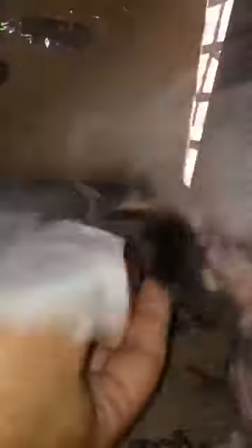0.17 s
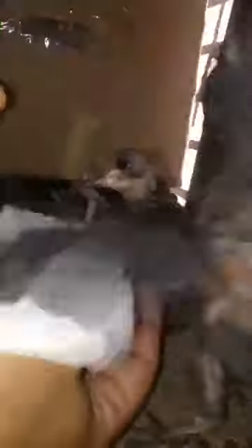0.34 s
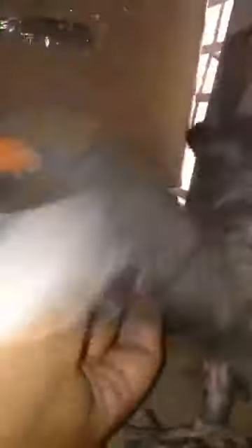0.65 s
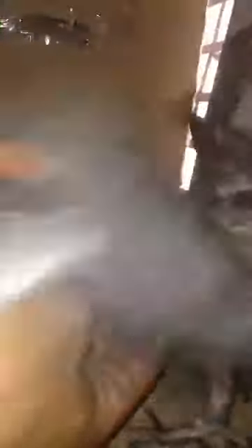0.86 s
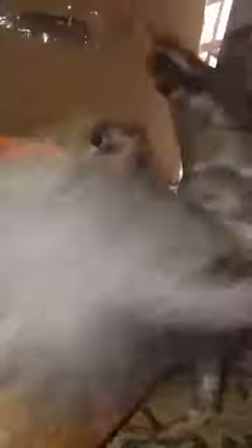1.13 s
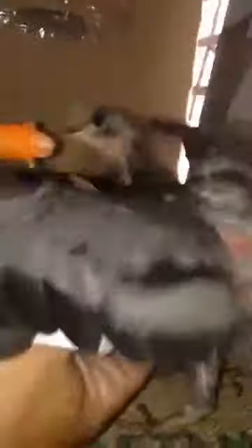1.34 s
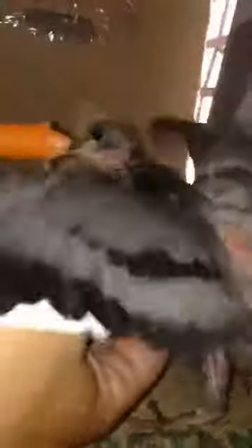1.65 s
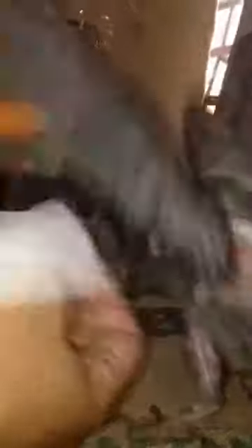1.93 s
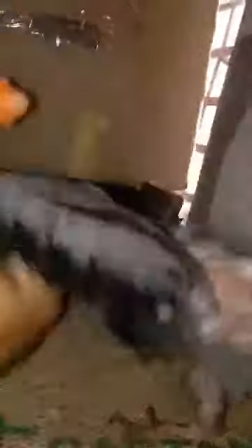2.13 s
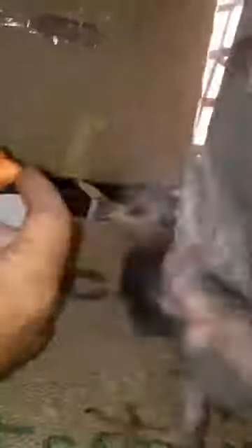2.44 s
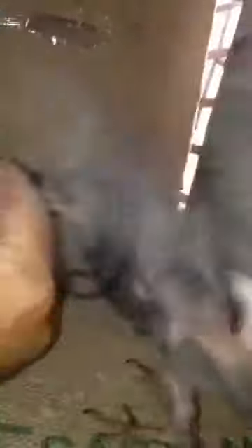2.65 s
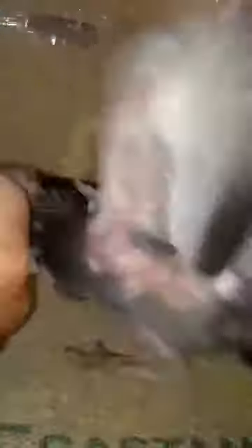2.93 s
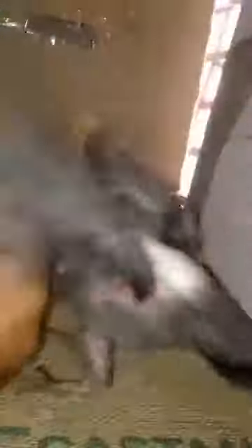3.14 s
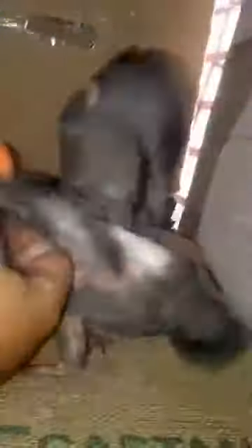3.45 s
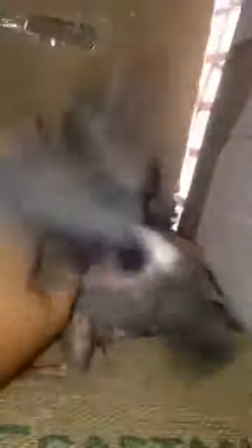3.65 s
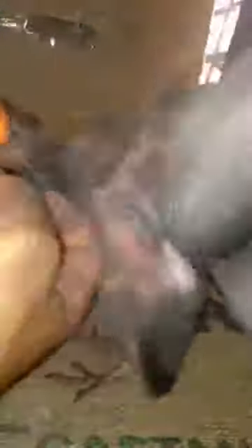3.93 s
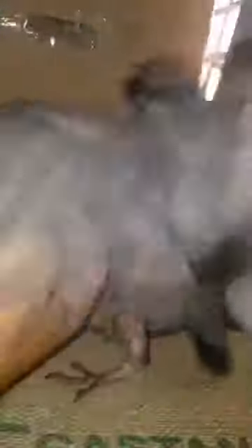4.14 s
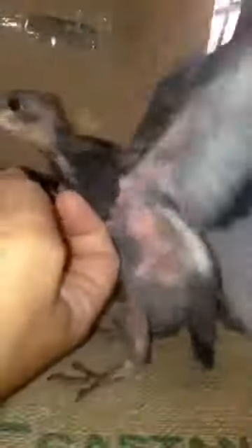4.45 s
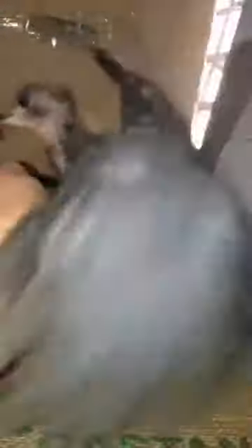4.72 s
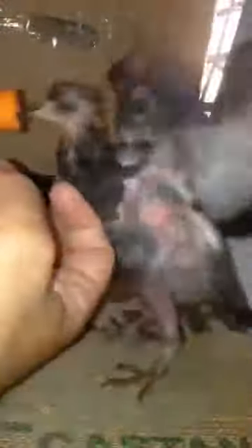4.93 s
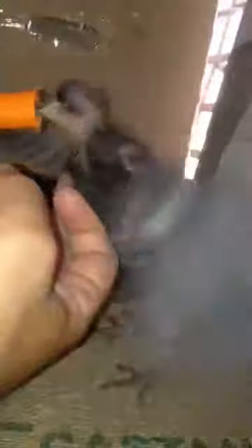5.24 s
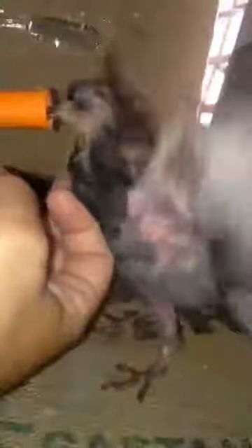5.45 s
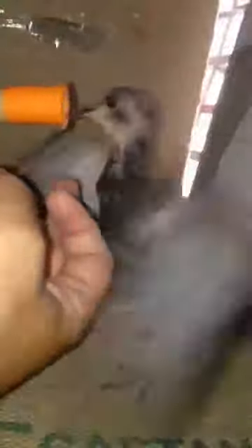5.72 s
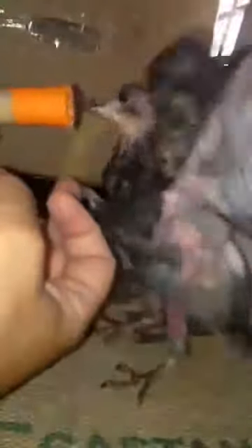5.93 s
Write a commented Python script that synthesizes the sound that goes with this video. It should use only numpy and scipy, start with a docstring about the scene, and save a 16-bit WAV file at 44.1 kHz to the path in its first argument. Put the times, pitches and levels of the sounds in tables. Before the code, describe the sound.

Inside a small cardboard box, close to the microphone, a young pigeon begs. A very short squeak comes first, then longer wheezy, trembling squeals about once a second. Wings beat quickly through the first four seconds with bright feather swishes, soft puffs of air and dull slaps on cardboard, then calm down. Small beak ticks, faint scuffs and a low draught lie underneath.

```python
"""Inside a cardboard box, close to the microphone, a young pigeon begs while it is hand-fed, about six seconds.
It opens with a short squeal; longer ones follow, and the last is still sounding near the end. Each is a wheezy
whistle of two pitches at once, from two modulated tones and filtered noise. Wings beat most densely in the
first four seconds: noise swishes, pulses of air and noise slaps on cardboard. Beak ticks are short noise bursts,
heard from about two seconds on. Faint scuffs, a rumbling draught and room noise lie under it throughout."""
import sys
import numpy as np
from scipy import signal
from scipy.fft import rfft, irfft
from scipy.io import wavfile
from scipy.ndimage import uniform_filter1d

SR = 44100
rng = np.random.default_rng(int(sys.argv[2]) if len(sys.argv) > 2 else 0)


def transcribe(u):
    """Save the signal u as a 16-bit wav file named by the first command-line argument.

    u: samples, shape (n,) or (channels, n), limited to [-1, 1]; the rate is SR.
    q: integer samples, one column per channel.
    """
    v = np.clip(np.atleast_2d(u).T, -1, 1)
    q = np.round(v * 32767).astype(np.int16)
    wavfile.write(sys.argv[1], SR, q)


N = 268128
TIME = np.arange(N) / SR


def amp(db):
    """Amplitude factor of a level in dB."""
    return 10 ** (np.asarray(db) / 20)


def unit(x):
    """Scales a sound to rms 1."""
    return x / np.sqrt(np.mean(x ** 2) + 1e-20)


def add(mix, start_s, sound):
    """Adds a sound into the mix from start_s, cut at the end of the mix."""
    part = mix[max(round(start_s * SR), 0):][:len(sound)]
    part += sound[:len(part)]


def colour(x, points):
    """Filters x by a spectrum of (freq_hz, level_db) points; rms 1."""
    hz, db = np.transpose(points)
    f = np.fft.rfftfreq(len(x), 1 / SR)
    gain = amp(np.interp(np.log(f + 1), np.log(hz), db))
    return unit(irfft(rfft(x) * gain, len(x)))


def noise():
    """White noise as long as the scene."""
    return rng.standard_normal(N)


def wander(rate_hz):
    """Smooth random motion that thins out above rate_hz; rms 1."""
    f = np.fft.rfftfreq(N, 1 / SR)
    return unit(irfft(rfft(noise()) / (1 + (f / rate_hz) ** 4), N))


def pulse(centre_s, peak_hz):
    """Pressure of one shove of air: push, suction, push, with its spectrum peaking at peak_hz."""
    out = np.zeros(N)
    near = abs(TIME - centre_s) < 0.05
    u = (np.pi * peak_hz * (TIME[near] - centre_s)) ** 2
    out[near] = (2 * u - 1) * np.exp(-u)
    return out


def voice(hz, rough, jitter, jitter_hz):
    """Phase of one membrane of the syrinx; it trembles more as the voice gets hoarse."""
    glide = uniform_filter1d(hz, size=300)
    return 2 * np.pi * np.cumsum(glide * (1 + jitter * rough * wander(jitter_hz))) / SR


# both voices brighten as their pitch rises above its usual value
LOW_HZ, HIGH_HZ, HIGH_DB_PER_KHZ, THIRD_DB_PER_KHZ = 4150, 4750, 7, 9
HIGH_FOLLOWS, THIRD_FOLLOWS = 0.62, 1  # share of the swings of effort that they take on
THIRD_FADE_DB_PER_S = 5.5  # the top of a call dulls as its push runs out
# the voice breaks up around one pitch and is clearer above and below it
BREAK_HZ, BREAK_WIDTH_HZ, CLEAR_ROUGH = 3584, 413, 0.17


def squeal(curve, high_db, fade_db_per_s, third_db, hoarse, wheeze_db):
    """Controls of one call on its own times: both pitches, roughness, level of the wheeze and of four partials."""
    point_s, *columns = np.transpose(curve)
    t = np.arange(point_s[0], point_s[-1], 0.002)
    low_hz, high_hz, low_db, second_db = (np.interp(t, point_s, c) for c in columns)
    effort = (low_db + second_db) / 2
    effort = effort - effort.mean()
    from_middle_s = t - t.mean()
    low_khz, high_khz = (low_hz - LOW_HZ) / 1000, (high_hz - HIGH_HZ) / 1000  # above the usual pitch
    high = high_db + HIGH_FOLLOWS * effort + HIGH_DB_PER_KHZ * high_khz - fade_db_per_s * from_middle_s
    third = third_db + THIRD_FOLLOWS * effort + THIRD_DB_PER_KHZ * low_khz - THIRD_FADE_DB_PER_S * from_middle_s
    near_break = np.exp(-((low_hz - BREAK_HZ) / BREAK_WIDTH_HZ) ** 2)
    rough = CLEAR_ROUGH + (hoarse - CLEAR_ROUGH) * near_break
    wheeze = wheeze_db + (second_db + third) / 2
    return np.array([t, low_hz, high_hz, np.clip(rough, 0, 1), wheeze, low_db, second_db, high, third])


# pitch and level of both voices, one curve a call; levels before the shared trim:
# point_s, low_pitch_hz, high_pitch_hz, low_level_db, second_harmonic_level_db (of the low voice)
CALL_CURVES = [
    [(0.0, 4240, 4440, -55, -56), (0.044, 3980, 4860, -45, -70), (0.078, 3750, 4200, -62, -54),
     (0.1, 3620, 3690, -48, -72)],
    [(0.16, 3850, 4530, -46, -53), (0.178, 4225, 5130, -37, -33.5), (0.223, 3893, 4650, -39.5, -44),
     (0.255, 4160, 4730, -49, -40.5), (0.301, 4000, 4430, -33.5, -49), (0.321, 3765, 4390, -47.5, -58),
     (0.363, 4135, 5010, -38, -34.5), (0.397, 3630, 4143, -41.5, -52), (0.435, 3380, 3792, -43, -55),
     (0.479, 3545, 4090, -37.5, -45.5), (0.511, 3000, 3430, -47.5, -70)],
    [(1.064, 3710, 4180, -49, -57), (1.105, 3790, 4470, -41.5, -54), (1.133, 4200, 5000, -44, -42),
     (1.155, 4300, 4950, -36, -45.5), (1.207, 3970, 4520, -58, -43.5), (1.255, 4260, 5120, -45.5, -40),
     (1.299, 3860, 4320, -40.5, -47), (1.345, 3853, 4330, -43, -38), (1.395, 3830, 4440, -43.5, -39),
     (1.433, 3690, 4050, -43.5, -45), (1.469, 3710, 4130, -38.5, -42.5), (1.519, 3200, 3610, -57, -67)],
    [(1.995, 3350, 4070, -58, -55), (2.039, 3850, 5000, -45.5, -53), (2.073, 3720, 4430, -44, -39),
     (2.093, 3150, 3580, -43, -78)],
    [(2.576, 4330, 5120, -52, -78), (2.606, 3990, 4960, -69, -56), (2.636, 3890, 4660, -47.5, -50),
     (2.698, 4200, 4670, -49, -46), (2.73, 3930, 4520, -41, -49), (2.772, 4190, 4870, -38.5, -44),
     (2.836, 3830, 4200, -40, -48), (2.865, 3620, 3990, -51, -50), (2.893, 3700, 4230, -46, -50),
     (2.909, 3540, 4040, -45, -51), (3.029, 3500, 3970, -42.5, -46), (3.093, 2800, 3030, -57, -61)],
    [(3.554, 3040, 3360, -55, -62), (3.57, 3360, 3810, -45.5, -53), (3.622, 3780, 4450, -44.5, -47),
     (3.692, 4140, 4900, -41, -40), (3.749, 4140, 4850, -35.5, -40), (3.791, 4370, 5360, -42.5, -42),
     (3.817, 4380, 4920, -35, -47), (3.865, 4000, 4610, -43, -43.5), (3.917, 4110, 4920, -38, -34),
     (3.961, 4140, 4720, -43.5, -51.5), (3.977, 3900, 4380, -35.5, -48), (4.085, 3550, 4160, -44, -43.5),
     (4.117, 3680, 4200, -41.5, -42.5), (4.169, 3130, 3440, -48.5, -39), (4.204, 2650, 2960, -76, -67)],
    [(4.655, 3720, 4580, -61, -61), (4.669, 3880, 4780, -50, -45), (4.717, 3630, 4570, -47, -41),
     (4.799, 3980, 4830, -49, -40), (4.909, 4160, 4830, -42.5, -36), (4.963, 3880, 4470, -50, -43.5),
     (4.995, 4040, 4890, -45, -40), (5.037, 3920, 4400, -48.5, -38), (5.07, 3720, 4280, -50.5, -45),
     (5.096, 3960, 4440, -44.5, -39), (5.132, 3690, 4140, -43, -40.5), (5.232, 3490, 4230, -56, -48.5),
     (5.286, 3200, 3630, -54.5, -43.5), (5.33, 3210, 3810, -58.5, -37.5), (5.354, 2550, 3120, -62, -46.5)],
    [(5.899, 3520, 4660, -50, -57), (5.923, 3700, 4860, -53, -46), (5.946, 3520, 4640, -47, -46),
     (6.014, 3840, 4790, -49, -41), (6.052, 3830, 4730, -50.5, -44), (6.076, 3990, 4950, -42.5, -41)],
]
# the voice of each call, in the same order; levels are starting points that pitch and effort move:
# high_level_db, high_fade_db_per_s, third_harmonic_level_db, hoarseness (0-1, at the break),
# wheeze_db (relative to the mean of the second and third harmonics)
CALL_VOICES = [(-50, 0, -55.5, 0.52, 3.5), (-44.5, 9, -42.5, 0.31, -14.5), (-46.5, 6, -47.5, .25, -12.5),
               (-51.5, 0, -63, 0.39, -17), (-45.5, 10, -56.5, .3, -2.5), (-46, 7, -44, 0.34, -8.5),
               (-51, -7, -47.5, 0.51, -5), (-52.5, -2, -49, 0.27, -6)]
# spectrum of the breath through the open beak: freq_hz, level_db (relative)
WHEEZE_SPECTRUM = [(500, -74), (2600, -35), (3400, -5), (4300, 8), (5500, 6), (6500, 4.5), (8300, 6),
                   (10000, 3.5), (12500, 1.5), (15500, 0.5)]
GATE_S = 0.011  # ramp at both ends of a call
WAVER_DB, WAVER_HZ = 1.0, 30  # each partial wavers a little on its own


def calls(shimmer_db=1.5, fuzz=0.83, low_fuzz=0.75, sum_db=-11, high2_db=-10, fourth_db=-14, air_db=-22,
          hoarse_db=7, rasp_hz=380, rasp=0.24):
    """Two membranes whistle at once and modulate each other; air hisses through the open beak."""
    each_call = [squeal(curve, *voicing) for curve, voicing in zip(CALL_CURVES, CALL_VOICES)]
    t, *controls = np.hstack(each_call)
    low_hz, high_hz, rough, wheeze_db, *levels = (np.interp(TIME, t, c) for c in controls)
    gate = np.zeros(N)
    for curve in CALL_CURVES:
        inside_s = np.minimum(TIME - curve[0][0], curve[-1][0] - TIME)
        gate += np.clip(inside_s / GATE_S + 0.5, 0, 1)
    low, second, high, third = (amp(db + WAVER_DB * wander(WAVER_HZ)) * gate for db in levels)
    a = voice(low_hz, rough, jitter=0.021, jitter_hz=224)
    b = voice(high_hz, rough, jitter=0.033, jitter_hz=176)
    # harmonics of both voices; combination tones grow where the two couple roughly
    coupling = amp(sum_db) * 2 * rough
    partials = [(low, a), (second, 2 * a), (third, 3 * a), (third * amp(fourth_db), 4 * a),
                (high, b), (np.sqrt(high * second) * amp(high2_db), 2 * b),
                (high * coupling, 2 * b - a), (second * coupling, a + b), (2 * third * coupling, 2 * a + b)]
    # turbulence frays every line into a narrow skirt of noise, the lowest least
    frays = [low_fuzz] + [fuzz] * (len(partials) - 1)
    tones = np.zeros(N)
    for (level, phase), fray in zip(partials, frays):
        skirt = wander(270) * np.cos(phase) + wander(270) * np.sin(phase)
        tones += level * (np.cos(phase) + fray * rough * skirt)
    # a fast unsteady flutter splits the hoarse stretches into strands
    flutter_phase = 2 * np.pi * np.cumsum(rasp_hz * (1 + 0.22 * wander(29.4))) / SR
    flutter = 1 + rasp * rough * np.sin(flutter_phase)
    tones = np.sqrt(2) * tones * flutter * amp(shimmer_db * wander(67))
    hiss_level = (amp(wheeze_db) * gate + amp(air_db) * np.hypot(low, high)) * amp(hoarse_db * rough)
    gusts = amp(2.4 * wander(48))
    return amp(-0.34) * tones + hiss_level * gusts * colour(noise(), WHEEZE_SPECTRUM)


def stroke(peak_s, db, rise_s, fall_s):
    """Power of one feather stroke: a bell around its peak."""
    u = TIME - peak_s
    width_s = np.where(u < 0, rise_s, fall_s)
    return amp(db) ** 2 * np.exp(-2 * np.minimum((u / width_s) ** 2, 20))


# feather strokes by the microphone: peak_s, level_db (before flutter and trim), half_length_s (before the lean)
FEATHER_STROKES = [(0.073, -38.5, 0.035), (0.316, -33.5, 0.017), (0.536, -35, 0.027), (0.72, -32.5, 0.019),
                   (0.812, -54.5, 0.018), (0.928, -33.5, 0.016), (1.206, -36.5, .016),
                   (1.494, -34.5, 0.023), (1.736, -41, 0.039), (1.785, -43, 0.021), (1.899, -44.5, 0.016),
                   (1.972, -35.5, 0.029), (2.16, -43.5, 0.12), (2.255, -37, 0.02), (2.463, -49, 0.057),
                   (2.49, -40, 0.018), (2.582, -49, 0.036), (2.704, -34.5, 0.012), (2.923, -39.5, 0.021),
                   (3.163, -51, 0.047), (3.411, -41.5, 0.018), (3.47, -36.5, 0.022), (3.619, -34, 0.028),
                   (3.716, -32, 0.026), (4.373, -55, 0.043), (5.395, -45, 0.028), (5.628, -57.5, 0.036),
                   (5.761, -47.5, 0.038)]
# spectrum of single scratching barbs: freq_hz, level_db (relative)
SCRATCH_SPECTRUM = [(120, -40), (200, -19.5), (812, -13.5), (1130, -13), (1280, -13.5), (2210, -9),
                    (2800, -11), (3120, -6.5), (3610, -8), (6240, -3.5), (9830, -2), (14700, -0.5),
                    (15500, -6.5)]
# spectrum of the merged hiss of a stroke: freq_hz, level_db (relative)
HISS_SPECTRUM = [(200, -15), (1000, -46), (2000, -13), (3200, -12), (4500, -8.5), (6500, 0), (9000, 2.5),
                 (12000, -0.5), (15000, -9)]
SWISH_LEAN = 0.16  # a stroke swells a little longer than it fades
SCRAPE_DB, SCRAPE_RISE_S, SCRAPE_FALL_S = -6, 0.012, 0.04  # feathers slide off the wall after a slap
RUSTLE_DB, SETTLE_DB, SETTLE_S = -64.5, -22.5, 0.33  # plumage never rests, and stirs more around each stroke


def feathers(flutter_db=1.5, merge_db=-38, ragged_db=1):
    """Barbs slide over one another and over the box: weak strokes scratch, strong ones merge into a bright hiss."""
    power = np.zeros(N)
    for peak_s, db, half_s in FEATHER_STROKES:
        power += stroke(peak_s, db, half_s * (1 + SWISH_LEAN), half_s * (1 - SWISH_LEAN))
    for peak_s, _, _, slap_db, *_ in WING_BLOWS:
        power += stroke(peak_s, slap_db + SCRAPE_DB, SCRAPE_RISE_S, SCRAPE_FALL_S)
    spread = np.exp(-abs(np.arange(-SR // 2, SR // 2)) / SR / SETTLE_S)
    around = abs(signal.fftconvolve(power, spread / spread.sum(), "same"))
    power += amp(RUSTLE_DB) ** 2 + amp(SETTLE_DB) ** 2 * around
    merged = power / (power + amp(merge_db) ** 2)  # share of the hiss, 0-1
    grain = amp(2.5 * wander(3000))
    scratches = colour(noise() * grain, SCRATCH_SPECTRUM)
    hiss = colour(noise(), HISS_SPECTRUM)
    swish = np.sqrt(1 - merged) * scratches + np.sqrt(merged) * hiss
    flutter = amp(flutter_db * wander(90.0) + ragged_db * wander(38))
    return amp(1.5) * np.sqrt(power) * swish * flutter


# resonances of the box: freq_hz, width_hz, level_db (relative)
BOX_RESONANCES = [(402, 57, 0.5), (680, 27, 3), (947, 20, -1.5), (1810, 28, 3), (2170, 33, -33)]


def ring(x, direct_db=-2):
    """Adds the dull resonances of the box to a sound; rms 1."""
    total = amp(direct_db) * x
    for hz, width_hz, db in BOX_RESONANCES:
        total = total + amp(db) * signal.lfilter(*signal.iirpeak(hz, hz / width_hz, SR), x)
    return unit(total)


# a wing strikes the cardboard; levels set the parts against each other, before their own trims:
# push_s, push_level_db, push_pitch_hz, slap_level_db, hollow_knock_level_db, quill_click_level_db
WING_BLOWS = [(0.157, -74, 195, -45.5, -70, -58), (0.2705, -33, 178, -39.5, -49, -27),
              (.456, -43, 176, -38, -49, -55), (0.6623, -33.5, 160, -38.5, -53, -51),
              (0.8894, -40, 84, -32, -45, -42), (1.065, -74, 197.5, -54.5, -49, -49),
              (1.1281, -38.5, 265, -39.5, -30.5, -30.5), (1.4118, -32, 164, -37, -32.5, -43),
              (1.698, -35, 216, -39, -46, -26.5), (2.1275, -36, 244, -36.5, -33, -45),
              (2.6789, -25, 83.6, -38.5, -30, -25), (2.896, -33.5, 92.2, -49, -39.5, -27.5),
              (3.143, -31.5, 164, -49.5, -48, -30), (3.3819, -34.5, 131, -41, -60, -49),
              (3.433, -46, 128, -50, -58, -55), (3.96, -70.5, 197, -48.5, -63, -49),
              (4.523, -53, 189.6, -47, -66, -38.5), (4.669, -54, 110.9, -50, -62, -72),
              (5.705, -34, 120, -48, -41, -40)]
# a wing shoves the air without touching: push_s, push_level_db, push_pitch_hz
AIR_SHOVES = [(0.071, -41, 93), (0.873, -22.5, 59.6), (.9, -32, 110), (.913, -34, 110),
              (0.9276, -28.5, 123.4), (1.66, -43, 60), (2.115, -32.5, 99.5), (2.305, -44, 63),
              (2.77, -48, 60.6), (3.139, -33.5, 69.5)]
# spectrum of the struck wall, before its resonances: freq_hz, level_db (relative)
CARDBOARD_SPECTRUM = [(60, 11), (170, 12), (550, -3.5), (1000, 1), (1700, 0), (3000, -6), (6000, -9),
                      (15000, -27)]
LEAD_S = 0.001994  # contact comes just before the peak of the air push


def blows(slap_s=0.0055, tail_s=0.017, tail_db=-13, clap_db=9, clap_s=0.0003, boom_db=-15, boom_s=0.0085,
          rebound_s=0.00855, rebound_db=-9, knock_hz=470):
    """A wing shoves the air (push, suction, push), claps on the cardboard, rebounds and leaves the wall shuddering."""
    out, slap, boom = np.zeros(N), np.zeros(N), np.zeros(N)
    t = np.arange(SR // 5) / SR
    slap_fade = (np.exp(-t / slap_s) + amp(tail_db) * np.exp(-t / tail_s)) * np.minimum(t / 0.00076, 1)
    boom_fade = np.exp(-t / boom_s) * np.minimum(t / 0.0028, 1)
    for push_s, push_db, push_hz, *_ in WING_BLOWS + AIR_SHOVES:
        out += amp(push_db) * pulse(push_s, push_hz)
        add(boom, push_s, amp(push_db + boom_db) * boom_fade)
    chances = rng.random(len(WING_BLOWS))
    for (push_s, _, _, slap_db, knock_db, _), chance in zip(WING_BLOWS, chances):
        # air trapped under the wing pops out at the moment of contact
        near = abs(TIME - push_s) < 0.05
        v = (TIME[near] - push_s + LEAD_S) / clap_s
        out[near] -= amp(slap_db + clap_db) * v * np.exp(-v ** 2)
        # the wall gives way with a short hollow knock
        out += amp(knock_db) * pulse(push_s, knock_hz)
        add(slap, push_s - LEAD_S, amp(slap_db) * slap_fade)
        # the rebound comes after a random delay
        add(slap, push_s + rebound_s * (0.5 + chance), amp(slap_db + rebound_db) * slap_fade)
    shudder = colour(noise(), [(30, -47), (90, -36), (200, 11.0), (400, -15), (1500, -51), (8000, -72)])
    wall = ring(colour(noise(), CARDBOARD_SPECTRUM))
    return out + amp(0.5) * slap * wall + boom * shudder


# beak on the feeding tip: start_s, level_db
BEAK_TICKS = [(1.878, -42), (2.1033, -20), (3.3688, -30), (3.446, -27), (4.643, -41), (5.36, -40)]
TICK_DECAY_S = 0.0038


def ticks():
    """Tiny hard contacts of beak and quills: bright noise that dies away within milliseconds."""
    force, t = np.zeros(N), np.arange(SR // 20) / SR
    quill_clicks = [(push_s - LEAD_S, click_db) for push_s, *_, click_db in WING_BLOWS]
    for start_s, db in BEAK_TICKS + quill_clicks:
        add(force, start_s, amp(db) * np.exp(-t / TICK_DECAY_S))
    return force * colour(noise(), [(300, -2), (2000, -18), (6000, -1.5), (10000, -1), (15000, -1.0)])


def box(x, decay_s=0.029, wet_db=-13):
    """Quick reflections between the cardboard walls: sparse random echoes that die away."""
    t = np.arange(SR // 6) / SR
    taps = rng.standard_normal(len(t)) * (rng.random(len(t)) < 0.06)
    taps = taps * np.exp(-t / decay_s) * (t > 0.0015)
    return x + amp(wet_db) * signal.oaconvolve(x, taps / np.linalg.norm(taps))[:N]


def scuffs(per_s=14, db=-66, spread_db=4, decay_s=0.011):
    """Claws and fingers shift on the cardboard floor: faint, uneven scrapes at random moments."""
    size = amp(db + spread_db * np.minimum(rng.exponential(1, N), 3))
    starts = size * (rng.random(N) < per_s / SR)
    level = signal.lfilter([1], [1, -np.exp(-1 / (decay_s * SR))], starts)
    floor = colour(noise(), [(100, -27), (300, -9), (1500, -0.5), (5000, 0.5), (15000, -10)])
    return level * ring(floor)


def draught(level_db=-64.0, calm_db_per_s=0.25, stir_db=-19, stir_s=0.23, lump_db=3):
    """Air stirred by the wings rumbles unevenly on the microphone: more around strokes, less as the bird calms."""
    air = colour(noise(), [(20, -56), (55, 4.5), (130, -6.0), (300, -8), (1000, -19.5), (3000, -18.5), (9000, -21)])
    power = sum(stroke(peak_s, db, half_s, half_s) for peak_s, db, half_s in FEATHER_STROKES)
    stir = abs(uniform_filter1d(power, size=int(stir_s * SR)))
    level = np.sqrt(amp(level_db) ** 2 + amp(stir_db) ** 2 * stir)
    return air * level * amp(lump_db * wander(32.0) - calm_db_per_s * (TIME - TIME.mean()))


# spectrum of the steady background: freq_hz, level_db (relative)
ROOM_SPECTRUM = [(18, -68), (30, -40), (140, 10.5), (192, 3.5), (505, -27.5), (747, -4), (1170, -12),
                 (1550, -8), (2990, -8.5), (9430, -4.5), (14300, -8), (15500, -6.5)]
ROOM_DB = -63


def room():
    """Steady noise of the room behind the box."""
    return amp(ROOM_DB) * colour(noise(), ROOM_SPECTRUM)


def scene():
    """Bird, feathers and ticks echo in the box; blows, scuffs, draught and room are added without those echoes."""
    in_box = box(calls() + feathers() + ticks())
    return (in_box + blows() + scuffs() + draught() + room())[None]


EDGE_HZ = 15600  # upper band limit


def record(dry):
    """The small microphone loses the deepest bass; then the band limit."""
    bass_cut = signal.butter(2, 26, "highpass", fs=SR, output="sos")
    thin = signal.sosfiltfilt(bass_cut, dry)
    band_limit = signal.firwin(401, EDGE_HZ, window=("kaiser", 8), fs=SR)
    return signal.oaconvolve(thin, band_limit[None], "same")


dry = scene()
out = record(dry)
transcribe(out)
```